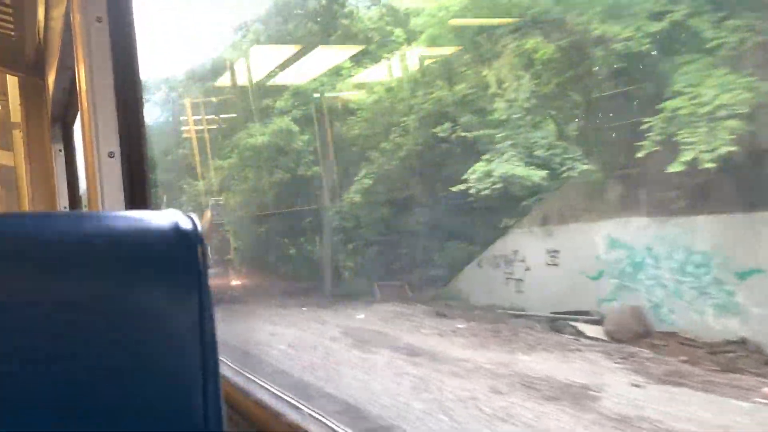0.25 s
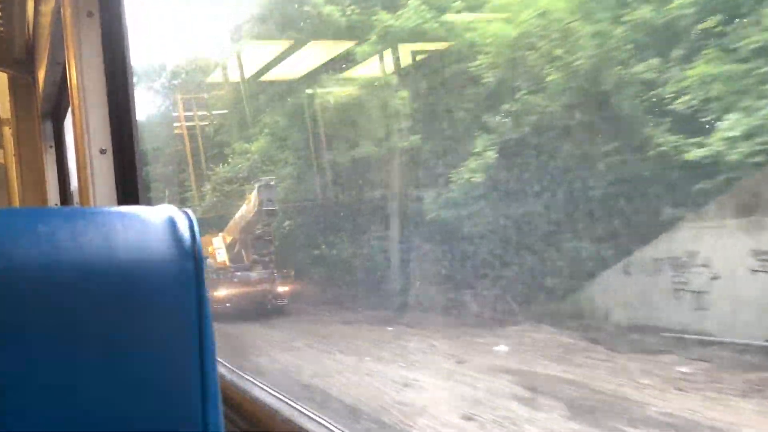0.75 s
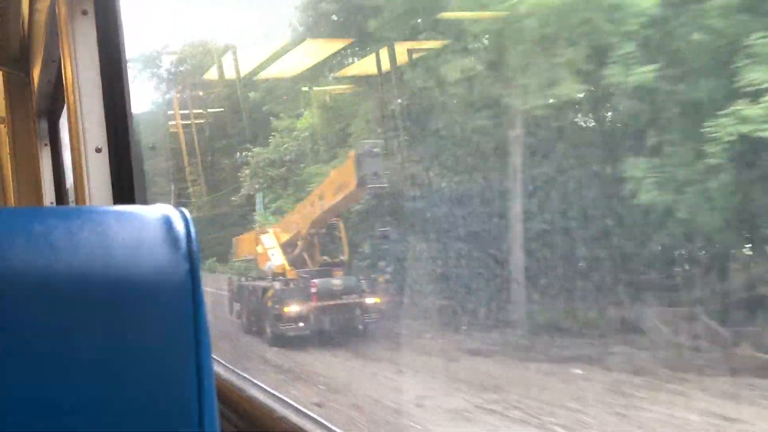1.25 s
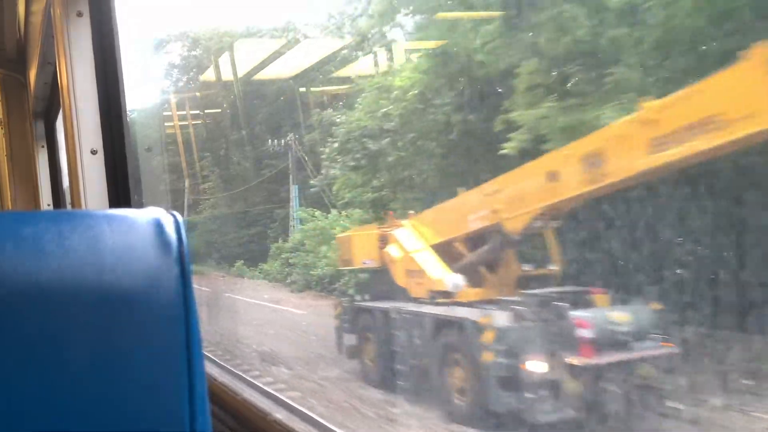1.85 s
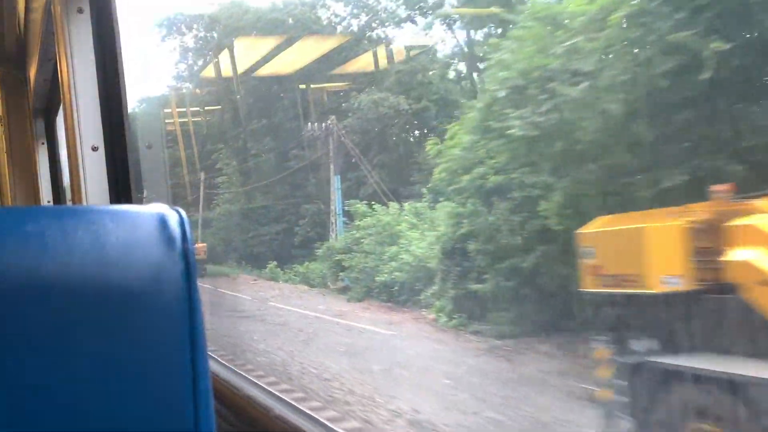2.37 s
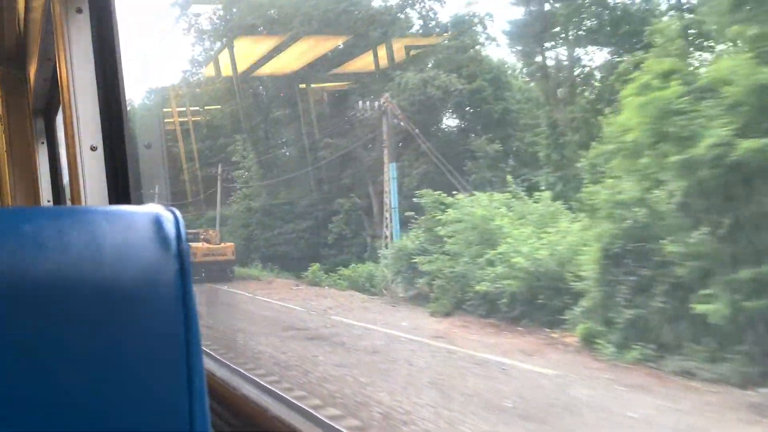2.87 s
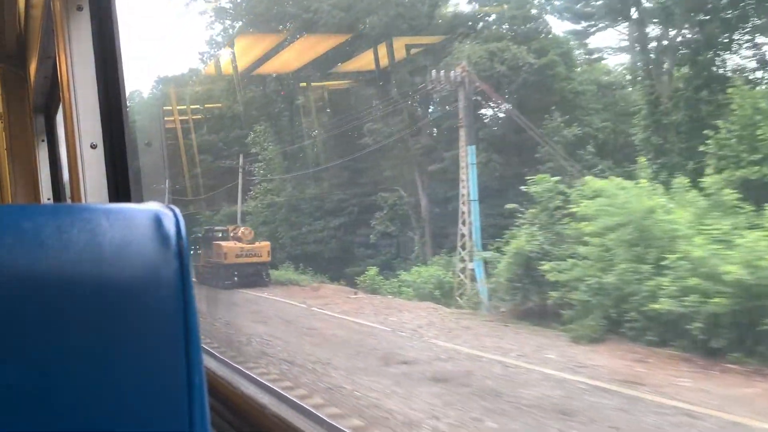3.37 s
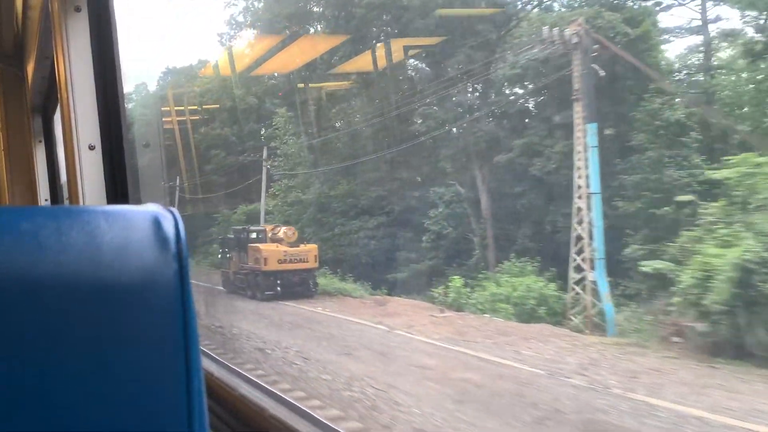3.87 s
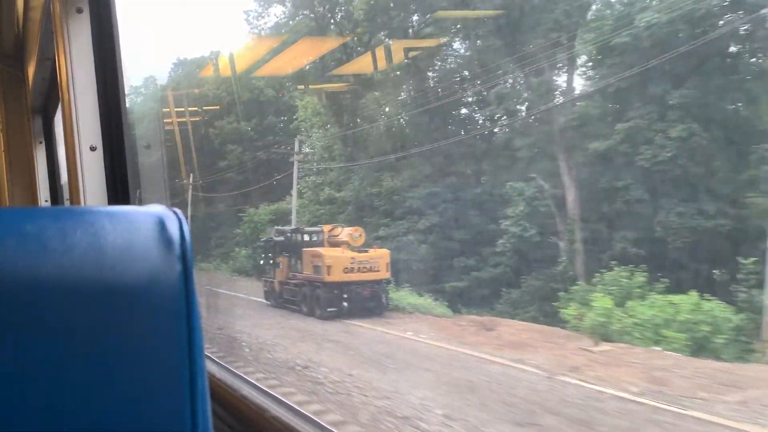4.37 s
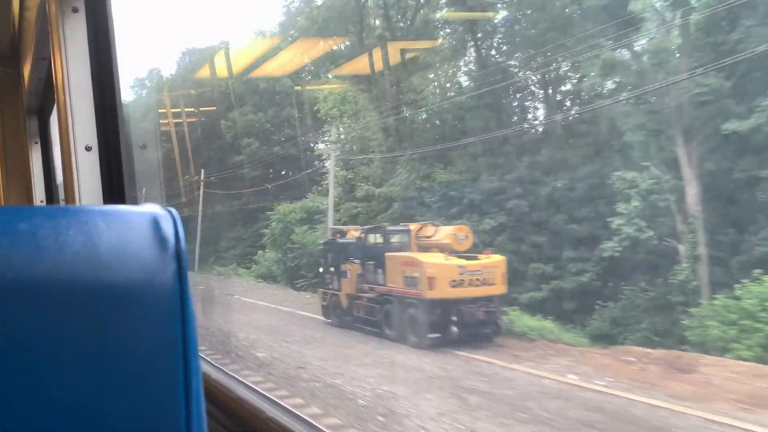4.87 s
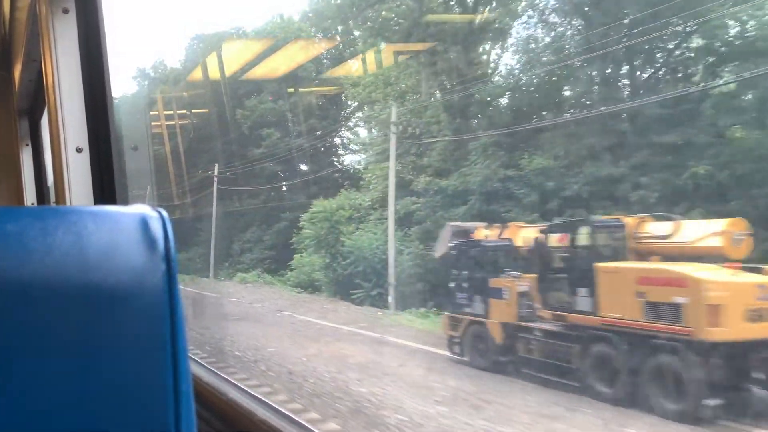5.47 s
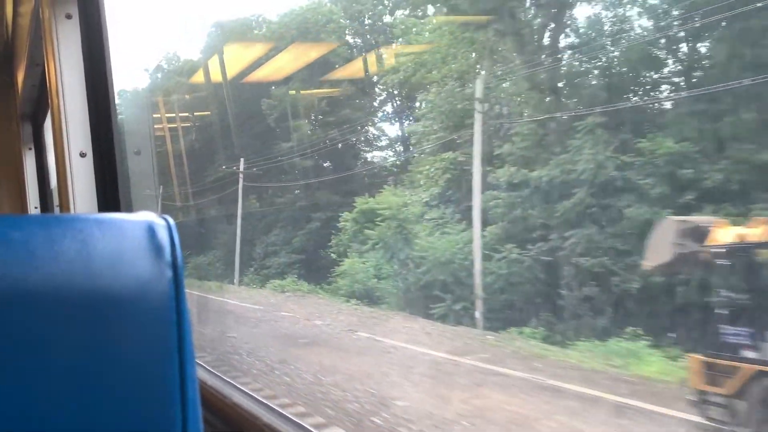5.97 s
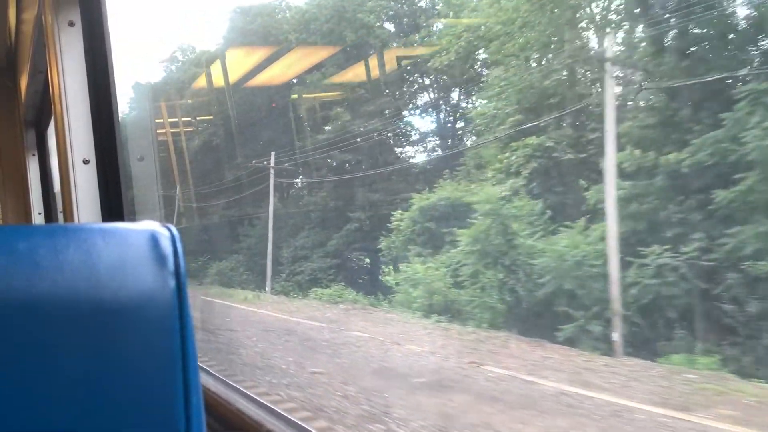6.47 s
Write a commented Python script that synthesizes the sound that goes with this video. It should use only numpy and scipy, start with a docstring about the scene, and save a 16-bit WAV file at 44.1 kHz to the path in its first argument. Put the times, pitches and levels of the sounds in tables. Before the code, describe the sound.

Inside a moving electric passenger train, near the window seats, captured by two close microphone ports. Throughout, heavy low wheel rumble dominates, gently lumpy, with softer ventilation roar and a dull hiss above it. Two low machine hums close in pitch beat irregularly, about three or four throbs per second; a deeper shaft tone grows until 3 s, then holds. Fan and motor whines are barely audible. Faint trim rustles occur at 0.2-0.75 s, with small clicks at 0.1, 0.65 and 0.85 s. Thin squeaks chirp around 1.4-1.65 s; another click comes at 2.1 s and a slight squeak at 2.55 s. A sharper double click lands at 3.4 s. From about 3 s, very fast faint metallic ticking appears, strongest near 5.2 s. Clicks cluster between 4.2 and 5 s, then thin out. Rumble swells near 6.5 s and the sound cuts off at 6.7 s, still rolling.

```python
"""Inside a rolling electric train

Wheel rumble and ventilation roar are shaped random spectra, with noise bands where the carriage shell rings.
Two machines a few hertz apart hum as near sines, and their beating throbs; motors and a fan whine
faintly as harmonic series. A loose part ticks as a regular train of decaying modes; trim panels click
as decaying noise and squeak and rustle as noise bands. Two close microphone ports hear it,
their likeness and phase depending on frequency.
"""
import sys
import numpy as np
from scipy import signal
from scipy.fft import rfft, irfft, next_fast_len
from scipy.io import wavfile
from scipy.ndimage import uniform_filter1d

SR = 44100
rng = np.random.default_rng(int(sys.argv[2]) if len(sys.argv) > 2 else 0)


def rack_gain(trim_db):
    """Turn a fader trim in dB into the linear factor to multiply a signal by."""
    fader = np.asarray(trim_db, float)
    return 10 ** (fader / 20)


def to_wav(sig):
    """Store sig (one row per channel, or 1-D mono) as 16-bit WAV at the path in sys.argv[1].

    Samples outside -1..1 are clipped; the rate is SR.
    """
    pcm = np.clip(np.atleast_2d(sig), -1, 1) * 32767
    pcm = np.round(pcm).astype(np.int16)
    wavfile.write(sys.argv[1], SR, pcm.T)  # frames by channels


N = 296793


def evened(x):
    """Normalization: scales a signal to rms 1."""
    return x / np.sqrt(np.mean(x ** 2) + 1e-20)


def read(points, hz):
    """Spectral envelope: interpolates levels on a logarithmic frequency axis."""
    f, value = np.transpose(points)
    return np.interp(np.log(hz + 1), np.log(f + 1), value)


def curve(rows, t):
    """Slow modulation: the columns of a table, interpolated linearly at times t."""
    s, *columns = np.transpose(rows)
    return [np.interp(t, s, c) for c in columns]


def slow(per_s):
    """Relaxation process: low-passed noise of rms 1 that forgets its past at the rate per_s."""
    noise = uniform_filter1d(rng.standard_normal(N), 400)
    return evened(signal.lfilter([1], [1, -np.exp(-per_s / SR)], noise))


def roar(patchy_db=1.3, flutter_db=1.0, ripple_db=1.7, lumpy_db=1.3):
    """Broadband noise as random short-time spectra: track roughness swells chiefly the rumble,
    everything above the bass comes in patches, and the bass itself is lumpy."""
    # rolling and ventilation noise, relative spectral density: f/Hz, level/dB per Hz
    roar_spectrum = [(15, -35), (26, -19), (31, -12), (40, -15), (52, -3), (62, -1.5), (88, -2.5),
                     (100, -8.5), (112, -11.5), (128, -10.5), (145, -9.5), (165, -12.5), (200, -16.5),
                     (225, -17), (260, -17.5), (340, -18), (400, -20.5), (600, -26), (1450, -26.5),
                     (1620, -32), (2100, -34), (2350, -38.5), (2900, -41.5), (4200, -43), (4800, -46),
                     (10500, -58.5), (11800, -71), (13500, -61), (16000, -88)]
    # roughness of the track under the wheels, used about its mean: t/s, rumble level/dB
    track_roughness = [(0, -26.5), (.35, -26.5), (.75, -28.5), (.95, -30.5), (1.22, -24.5), (1.4, -30),
                       (1.7, -24.5), (2.1, -28), (2.4, -26.5), (2.6, -31.5), (2.9, -29), (3.5, -32),
                       (3.85, -26), (4.2, -28.5), (4.65, -29), (5.15, -26.5), (5.5, -31), (6.2, -26),
                       (6.5, -22.5), (6.73, -30)]
    # rolling noise thrown back by what stands beside the line: t/s, level/dB
    wayside_echo = [(0, -0.5), (.4, 0), (1, -1), (2.4, -1.3), (3.2, -0.6), (3.7, -0.5), (4.2, -1),
                    (4.7, 0.1), (5.6, -0.5), (6.73, -0.6)]
    roar_db = -26.5  # rms
    track_in_middle, track_in_hiss, wayside_in_hiss = 0.033, 0.05, 0.91  # shares of each swell in dB

    frames, hz = N // 512 + 5, np.fft.rfftfreq(2048, 1 / SR)[:, None]
    frame_s = np.arange(frames) * 512 / SR
    a, b, c, d, patches = rng.standard_normal((frames, 1025, 5)).T
    patches = evened(uniform_filter1d(uniform_filter1d(patches, 25, 0), 6, 1))
    # the lowest bins fluctuate one by one
    lumps = evened(uniform_filter1d(rng.standard_normal((frames, 8)), 5, 0))
    lumps = lumps.T[np.minimum(np.arange(1025), 7)]
    flutter = evened(uniform_filter1d(rng.standard_normal(frames), 5))
    # standing waves in the carriage: a fixed fine ripple on the spectrum above the bass
    ripple = evened(uniform_filter1d(rng.standard_normal((2, 1025, 1)), 2, 1)) * (hz > 300)

    low = 1 / (1 + (hz / 100) ** 6)
    high = 1 / (1 + (4000 / (hz + 1)) ** 3)
    middle = (1 - high) / (1 + (800 / (hz + 1)) ** 3)
    track_db = curve(track_roughness, frame_s)[0]
    track_db = track_db - track_db.mean()
    field_db = read(roar_spectrum, hz) + (low + track_in_middle * middle + track_in_hiss * high) * track_db
    field_db = field_db + (middle + wayside_in_hiss * high) * curve(wayside_echo, frame_s)[0]
    field_db = field_db + high * flutter_db * flutter
    field_db = field_db + (middle + high) * patchy_db * patches + low * lumpy_db * lumps
    spectra = np.array([a + 1j * b, c + 1j * d]) * rack_gain(field_db + ripple_db * ripple)
    return rack_gain(roar_db) * evened(signal.istft(spectra, nperseg=2048, noverlap=1536)[1][:, :N])


def hums(t):
    """Beating of two machines: near sines a few hertz apart reinforce and cancel as their phases drift."""
    # speed of the first machine: t/s, f/Hz of its strongest line
    machine_speed = [(0, 117.89), (2.45, 118.12), (4.8, 118.71), (6, 118.33), (6.73, 118.35)]
    # lines that follow the first machine's load: multiple of the strongest line, offset level/dB
    load_lines = [(.25, -15.5), (1, -1.5)]
    # load on each machine: t/s, first machine's level/dB before line offset and waver, second's rms level/dB
    machine_loads = [(0, -29, -35.5), (.12, -30.5, -37.5), (.3, -32, -32), (.7, -33.5, -29.5),
                     (.8, -38, -33), (.92, -39, -35), (1.02, -25.5, -35), (1.38, -30.5, -32.5),
                     (1.47, -42, -35.5), (1.6, -29, -32), (1.97, -27.5, -33.5), (2.05, -40, -39.5),
                     (2.18, -34, -27.5), (2.5, -29.5, -28.5), (3.1, -34, -27.5), (3.45, -34, -37.5),
                     (3.66, -32.5, -30.5), (4.1, -32.5, -36.5), (4.4, -35.5, -36), (4.6, -32.5, -40),
                     (4.9, -32, -35), (5.05, -25.5, -36), (5.2, -34.5, -38.5), (5.4, -24, -41),
                     (5.55, -29.5, -43), (5.8, -34.5, -45.5), (6.2, -29.5, -41.5), (6.45, -30.5, -40.5),
                     (6.73, -33, -34)]
    # single lines, rms: t/s, first machine's half line level/dB, second's half line level/dB,
    # first machine's third half-multiple level/dB
    half_levels = [(0, -29, -47, -38.5), (.33, -36.5, -27, -43), (.5, -40, -49, -36.5),
                   (.75, -35.5, -36.5, -38.5), (1.1, -48.5, -49, -37), (1.5, -39, -35, -40),
                   (2.2, -36, -39, -39.5), (2.4, -30, -52, -48), (2.58, -35.5, -43, -40.5),
                   (3, -32, -49, -48), (3.8, -42, -36.5, -46), (4.2, -44, -36, -41.5), (4.8, -43, -36, -38),
                   (5.15, -38.5, -36.5, -48), (5.4, -42, -41, -51), (6, -51, -45, -39),
                   (6.73, -39, -44, -41.5)]
    # the first machine's octave comes and goes: t/s, rms level/dB
    octave_level = [(0, -40), (.16, -34), (.45, -44.5), (.58, -34.5), (.68, -46), (.85, -40), (1.6, -39),
                    (1.8, -38), (2, -40.5), (2.12, -34.5), (2.5, -38.5), (2.85, -40.5), (3, -35.5),
                    (3.3, -44.5), (3.6, -40), (4.1, -40), (4.7, -40.5), (5.05, -44), (5.25, -33.5),
                    (5.48, -48), (5.6, -37.5), (5.8, -42), (6.3, -38), (6.45, -42.5), (6.73, -42.5)]
    # moments when the two hums cancel, one slip cycle apart: t/s
    cancel_s = [.0, .41, .83, 1.18, 1.55, 1.75, 2.11, 2.31, 2.65, 2.94, 3.2, 3.42, 3.76, 4.0, 4.17, 4.41,
                4.71, 4.97, 5.26, 5.61, 5.88, 6.1, 6.38, 6.64, 6.9]
    waver_db = 0.8  # rms
    third_sharp_hz = 0.593  # the third half-multiple sits a little sharp
    # a deep shaft tone grows, then holds
    shaft_hz, shaft_full_db, shaft_rise_db_per_s, shaft_full_s = 34.1, -35, 9.5, 3

    turns = np.cumsum(curve(machine_speed, t)[0]) / SR
    slip = np.interp(t, cancel_s, np.arange(len(cancel_s)) + .5)  # opposite phase at each half cycle
    slip = uniform_filter1d(slip, 2000, mode="nearest")
    second_turns = turns - slip
    first_db, second_db = curve(machine_loads, t)
    first_db = first_db + waver_db * slow(3.9)
    half_db, second_half_db, third_db = curve(half_levels, t)
    shaft_db = shaft_full_db - shaft_rise_db_per_s * np.maximum(shaft_full_s - t, 0) + slow(3)
    lines = [(k * turns, db + first_db) for k, db in load_lines]
    lines += [
        (turns / 2, half_db),
        (3 * turns / 2 + third_sharp_hz * t, third_db),
        (2 * turns, curve(octave_level, t)[0]),
        (second_turns, second_db),
        (second_turns / 2, second_half_db),
        (shaft_hz * t, shaft_db)]
    return np.sqrt(2) * sum(rack_gain(db) * np.cos(2 * np.pi * phase) for phase, db in lines)


def shell():
    """Resonance: noise concentrated in narrow bands, mostly where the carriage shell rings."""
    # narrow noise bands: f/Hz, half-power width/Hz, relative level/dB; most are shell resonances, the 140 Hz
    # band sits at the fan's blade rate
    shell_modes = [(140, 12, -41), (335, 12, -52), (297, 8, -52), (356, 10, -55), (452, 14, -50),
                   (484, 10, -54), (555, 20, -58), (641, 14, -55.5), (673, 10, -59.5), (760, 16, -59),
                   (841, 10, -61), (877, 10, -58.5), (1002, 12, -60), (1287, 10, -59), (1351, 16, -60),
                   (1448, 16, -60.5), (1507, 10, -60.5), (1722, 25, -67), (1922, 18, -66), (2546, 12, -70),
                   (3198, 14, -75), (4414, 20, -75)]
    hz = np.fft.rfftfreq(N, 1 / SR)
    power = sum(rack_gain(2 * db) / width / (1 + (2 * (hz - f) / width) ** 4) for f, width, db in shell_modes)
    return irfft(rfft(rng.standard_normal((2, N))) * np.sqrt(power * SR / 2 / 0.6), N)


def clicks(tail_db=-7, crack_s=0.029, rise_s=0.00055):
    """Impulsive excitation: a bright crack, then the carriage's reverberant tail, unrelated in two channels."""
    # panel clicks: t/s, nominal peak level/dB, spectral tilt/dB per octave about the pivot
    panel_clicks = [(0.109, -42.5, -1), (0.648, -38, 6), (0.663, -41, 4), (0.848, -38, 0),
                    (2.1334, -36.5, 6), (2.3095, -43, -6), (2.7994, -41, -2), (3.3958, -33, -0.5),
                    (3.401, -36.5, 3), (3.4234, -42, 8), (4.2313, -40, 1), (4.3498, -35.5, 4),
                    (4.576, -40, -4), (4.6349, -40, -3), (4.777, -39, -2), (4.8633, -39.5, 5),
                    (4.876, -35.5, 0), (4.948, -41, 4), (4.9786, -40, 5), (5.5794, -43.5, 0),
                    (5.7254, -43, 1), (6.0422, -45, 4), (6.3586, -38.5, 3), (6.7042, -41, 4)]
    # spectrum common to all clicks: f/Hz, relative level/dB
    click_colour = [(1500, -31), (3000, -11), (5000, 7.5), (8000, 5.5), (10800, 0), (11800, -11),
                    (13300, -6), (14500, -10), (16000, -20)]
    pivot_hz, tail_s = 8000, 0.47  # tail_s and crack_s are 60 dB decay times

    age, out = np.arange(SR // 2) / SR, np.zeros((2, N))
    hz = np.fft.rfftfreq(len(age), 1 / SR)
    decay = rack_gain(-60 * age / crack_s) + rack_gain(tail_db - 60 * age / tail_s)
    shape = np.minimum(age / rise_s, 1) * decay
    for s, db, tilt_db in panel_clicks:
        colour = rack_gain(read(click_colour, hz) + tilt_db * np.log2((hz + 1) / pivot_hz))
        noise = evened(irfft(rfft(rng.standard_normal((2, len(age)))) * colour, len(age)))
        part = out[:, round(s * SR):][:, :len(age)]
        part += (rack_gain(db) * shape * noise / 3.6)[:, :part.shape[1]]  # noise peaks at about 3.5 times its rms
    return out


def ticks(uneven_db=2, mode_db=2):
    """Modal ringing: regular small blows, strongest once a turn, excite a metal part at varying spots."""
    # looseness of the part: t/s, blow level/dB before the other offsets
    looseness = [(2.9, -82), (3.3, -58.5), (4, -60), (5.2, -55), (6.73, -61)]
    # modes of the metal part: f/Hz, relative level/dB, 60 dB decay time/s
    tick_modes = [(3960, -16, .012), (4050, 2, 0.03), (4300, 2, 0.02), (4550, -4, .015), (2110, -12, .015),
                  (6200, -3, .008), (8200, -5, .006), (10000, -9, .005), (13300, -16, .005)]
    # the six blows of a turn: offset level/dB
    turn_blows = [9.5, 4.5, 3, -5, 4, -1]
    ticks_per_s, strong_s, jitter_s = 34.72, 5.036, 0.00065  # strong_s: time of one strongest blow

    k = np.arange(-72, 58)
    s = strong_s + k / ticks_per_s
    luck = rng.standard_normal((len(k), 2 + len(tick_modes)))
    at = np.clip(((s + jitter_s * luck[:, 0]) * SR).astype(int), 0, N - 1)
    blow_db = curve(looseness, s)[0] + np.array(turn_blows)[k % 6] + uneven_db * luck[:, 1]
    t, out = np.arange(2000) / SR, np.zeros(N)
    for spot, (hz, db, t60) in zip(luck[:, 2:].T, tick_modes):
        blows = np.zeros(N)
        blows[at] = rack_gain(blow_db + mode_db * spot)
        ring = rack_gain(db - 60 * t / t60) * np.sin(2 * np.pi * hz * t)
        out += signal.oaconvolve(blows, ring)[:N]
    return out


def squeaks():
    """Friction of trim as soft-ended noise bands: still rustles, and narrow squeaks, some of them sliding."""
    # broad rustles of rubbing trim: t/s, rms level/dB, f/Hz, width/Hz, length/s
    rustle_rows = [(.2, -57, 4000, 500, .08), (.26, -48, 1500, 300, .16), (.28, -54, 2000, 250, .12),
                   (.55, -53.5, 3450, 1000, .12), (.62, -53.5, 3400, 1300, .15),
                   (1.57, -54, 3900, 900, .07), (1.57, -57, 2800, 400, .07)]
    # squeaks: t/s, rms level/dB, start f/Hz, end f/Hz, length/s
    squeak_rows = [(1.43, -59, 3300, 3300, .03), (1.49, -60, 4000, 4150, .04),
                   (1.51, -53.5, 2250, 2450, .065), (1.546, -49.5, 4300, 4150, .025),
                   (1.575, -52.5, 4200, 3950, .04), (1.585, -53.5, 2330, 2280, .075),
                   (2.55, -58, 2950, 2950, .06)]
    squeak_width_hz, squeak_steady = 130, 1.3  # roughness band; steady tone against its rms

    out = np.zeros(N)
    rows = [(s, db, hz, hz, width, 0, length) for s, db, hz, width, length in rustle_rows]
    rows += [(s, db, start_hz, end_hz, squeak_width_hz, squeak_steady, length)
             for s, db, start_hz, end_hz, length in squeak_rows]
    for s, db, start_hz, end_hz, width, steady, length in rows:
        t = np.arange(round(length * SR)) / SR
        noise = rng.standard_normal((SR // 4, 2)) @ [1, 1j]
        pole = np.exp(-np.pi * width / SR)
        wobble = signal.lfilter([1], np.poly([pole, pole]), noise)[-len(t):]
        wobble = steady + wobble / np.std(wobble)
        turns = start_hz * t + (end_hz - start_hz) * t ** 2 / (2 * length)
        band = evened((wobble * np.exp(2j * np.pi * turns)).real)
        soft_ends = np.sqrt(2) * np.sin(np.pi * t / length)
        out[round(s * SR):][:len(t)] += rack_gain(db) * band * soft_ends
    return out


def fan(unsteady=.0013, waver_db=2.8):
    """Blade-passing tones: multiples of the ventilation fan's blade rate, thin lines that waver a little."""
    # fan lines: multiple of the blade rate, median rms level/dB
    fan_lines = [(2, -52), (3, -60), (4, -58), (7, -55), (8, -57.5), (9, -68)]
    blade_hz = 138.55
    turns = np.cumsum(blade_hz * (1 + unsteady * slow(27.6))) / SR
    return np.sqrt(2) * sum(
        rack_gain(db + waver_db * slow(10.4)) * np.cos(2 * np.pi * (k * turns + rng.random()))
        for k, db in fan_lines)


def whine(unsteady=.0012, waver_db=2.5):
    """Slot harmonics of the motors: a quick wobble of speed blurs the upper multiples of the slot rate."""
    # slot rate: t/s, f/Hz
    slot_rate = [(0, 335.6), (2.2, 335.7), (4.5, 336.2), (6.73, 335.8)]
    # whine lines: multiple of the slot rate, median rms level/dB
    whine_lines = [(5, -69), (6, -63), (14, -70), (15, -73), (16, -73), (17, -73), (18, -74), (19, -78),
                   (20, -74), (21, -75), (22, -80), (23, -79), (24, -75), (25, -75), (26, -80), (27, -84),
                   (29, -82), (30, -84), (31, -86)]
    rate_hz = curve(slot_rate, np.arange(N) / SR)[0]
    turns = np.cumsum(rate_hz * (1 + unsteady * slow(87.0))) / SR
    return np.sqrt(2) * sum(
        rack_gain(db + waver_db * slow(40)) * np.cos(2 * np.pi * (k * turns + rng.random()))
        for k, db in whine_lines)


def ports(x, other):
    """Spatial coherence: the right port hears a phase-shifted copy of the left, mixed with the sound other."""
    # likeness of the ports, linear in frequency: f/Hz, likeness (0-1)
    port_likeness = [(30, .999), (80, .955), (200, .93), (350, .78), (550, .35), (1500, .4), (2300, .15),
                     (7500, .3), (8800, .2), (9500, .35), (10200, .75), (12000, .8), (16000, .85)]
    # phase between the ports, linear in frequency: f/Hz, lead of the left/rad
    left_lead = [(0, 0), (200, .2), (430, .8), (2000, 4.5), (7900, 23.7), (10200, 18.9), (14900, 9.9)]
    # level difference of the ports: f/Hz, left minus right level/dB
    port_tilt = [(20, -.6), (40, 1), (60, -3), (110, 2), (200, -4.5), (380, -0.5), (700, 0.1), (1290, -0.4),
                 (2380, 0.5), (4400, 2.5), (8120, -5), (15000, 4)]
    size, margin = next_fast_len(N + 4096), 2048  # margin in samples
    hz = np.fft.rfftfreq(size, 1 / SR)
    same = np.clip(np.interp(hz, *np.transpose(port_likeness)), 0, 1)
    left, other = rfft(np.pad([x, other], [(0, 0), (margin, margin)], "reflect"), size)
    shifted = left * np.exp(-1j * np.interp(hz, *np.transpose(left_lead)))
    right = same * shifted + np.sqrt(1 - same ** 2) * other
    tilt = rack_gain(read(port_tilt, hz) / 2)  # half the difference on each side
    return irfft([left * tilt, right / tilt], size)[:, margin:margin + N]


def scene():
    """Superposition: hum, ticks and squeaks also arrive by a later path off the walls; the fan is alike
    in both ports."""
    t = np.arange(N) / SR
    small = ticks() + squeaks()
    wide = roar() + shell() + clicks() + [whine(), whine()]
    hum = hums(t)
    later_small = np.roll(small, 151)  # 3.4 ms
    later_hum = np.pad(hum, (60, 0), "reflect")[:N]  # 1.4 ms
    return ports(wide[0] + small + hum, wide[1] + later_small + later_hum) + fan()


def roll_off(x):
    """The treble ends steeply here."""
    return signal.sosfilt(signal.butter(12, 15610, fs=SR, output="sos"), x)


def record(dry):
    """Smooth termination: a squared-sine fade over the last 4 ms."""
    left_s = np.arange(N)[::-1] / SR
    fade = np.sin(np.pi / 2 * np.minimum(left_s / .004, 1)) ** 2
    return roll_off(dry * fade)


dry = scene()
out = record(dry)
to_wav(out)
```